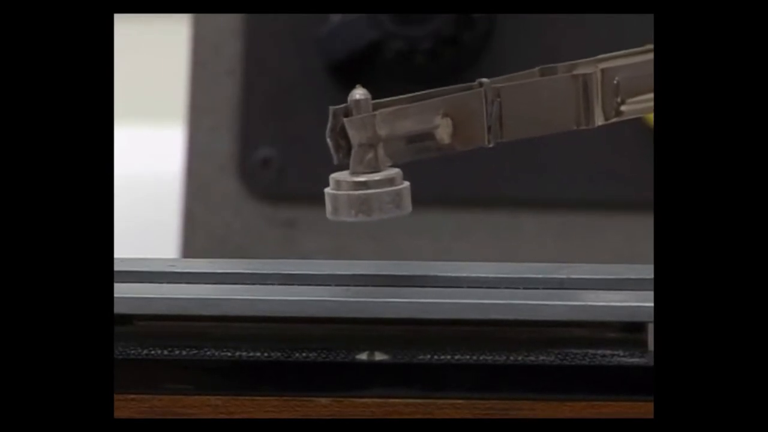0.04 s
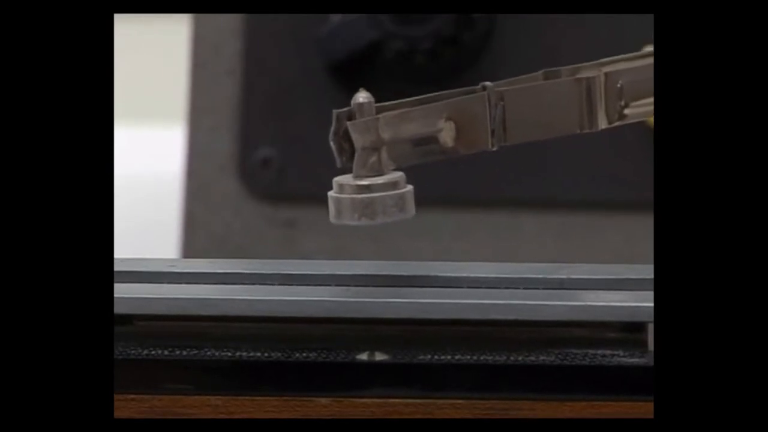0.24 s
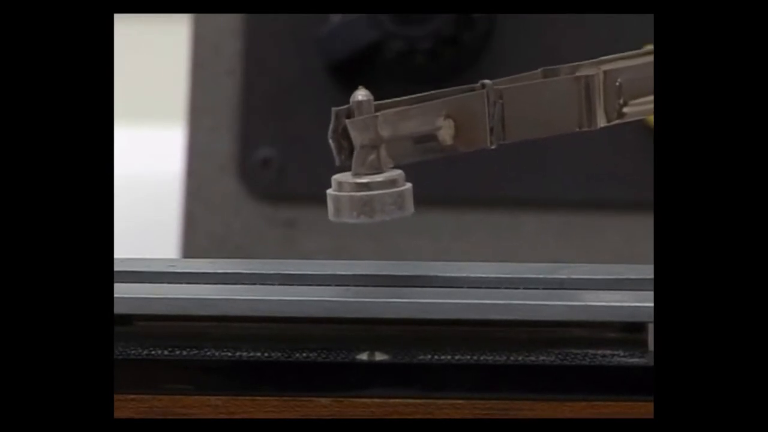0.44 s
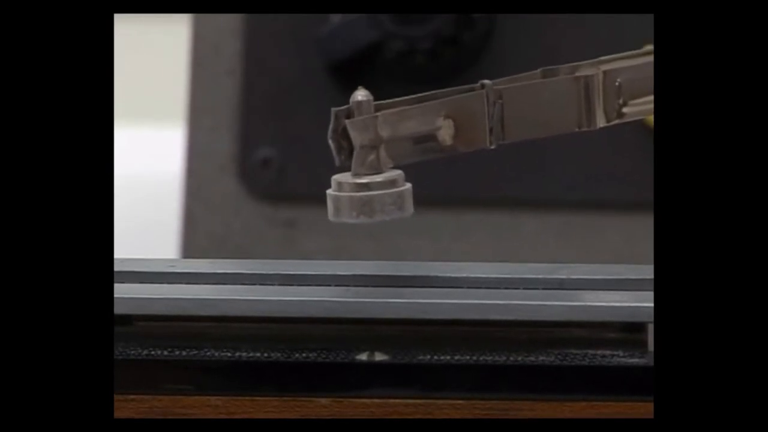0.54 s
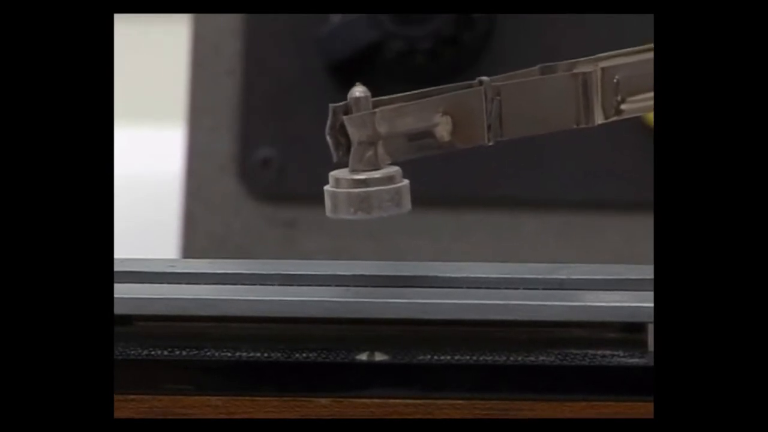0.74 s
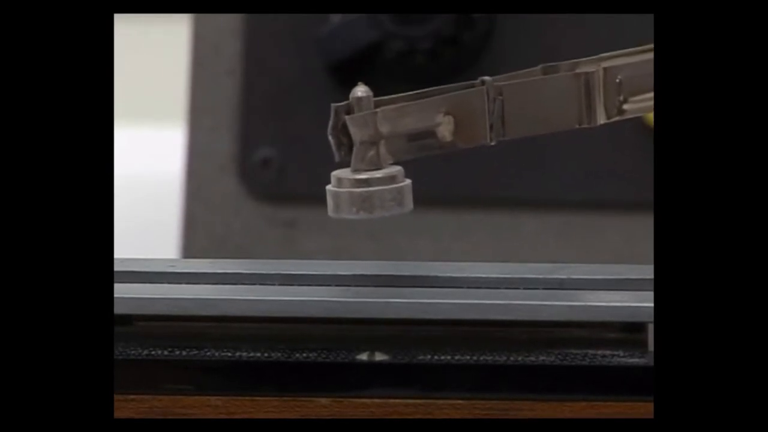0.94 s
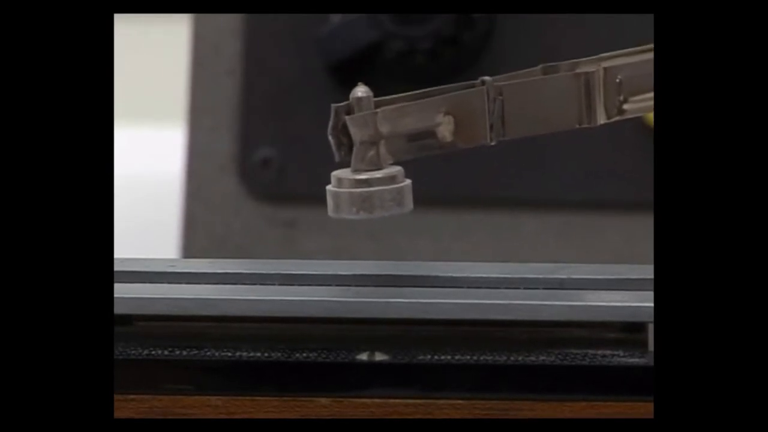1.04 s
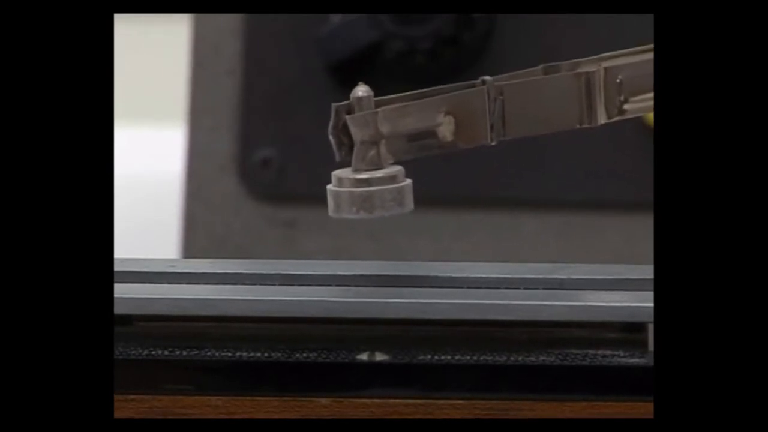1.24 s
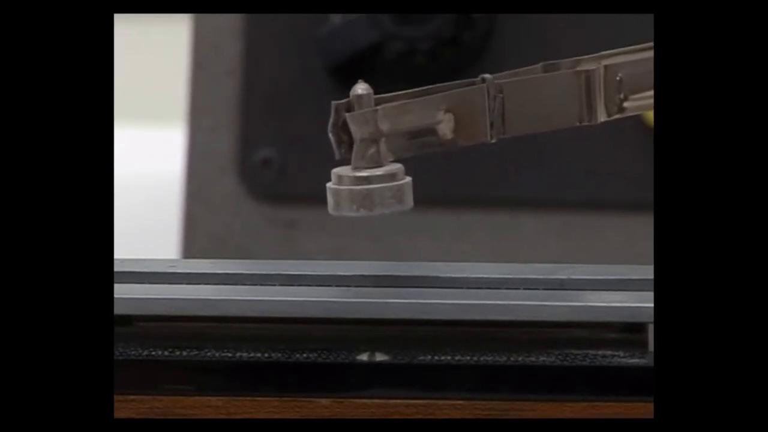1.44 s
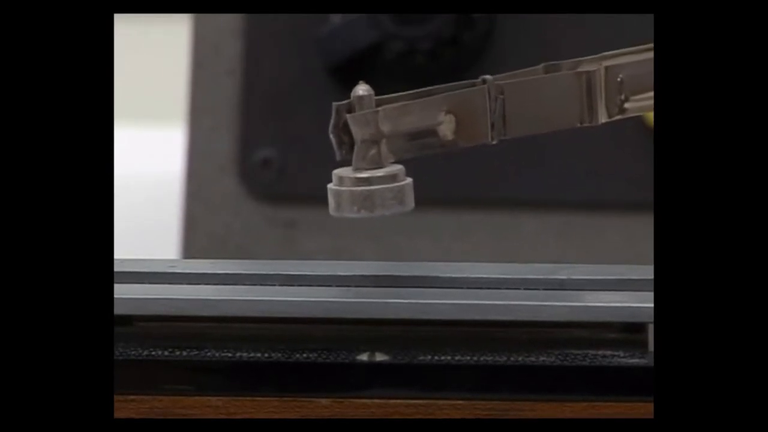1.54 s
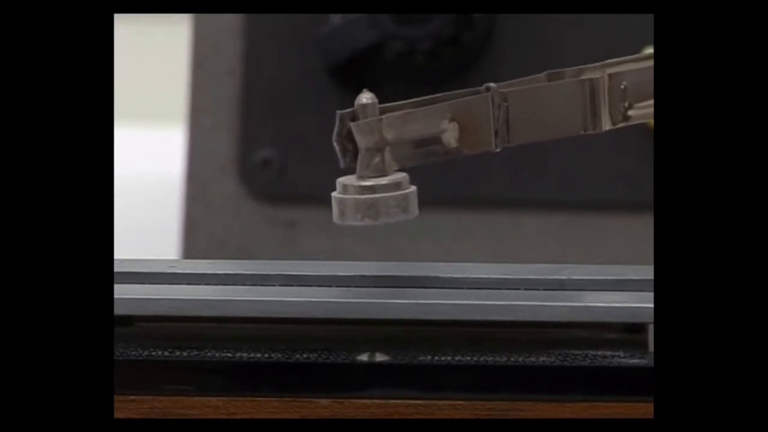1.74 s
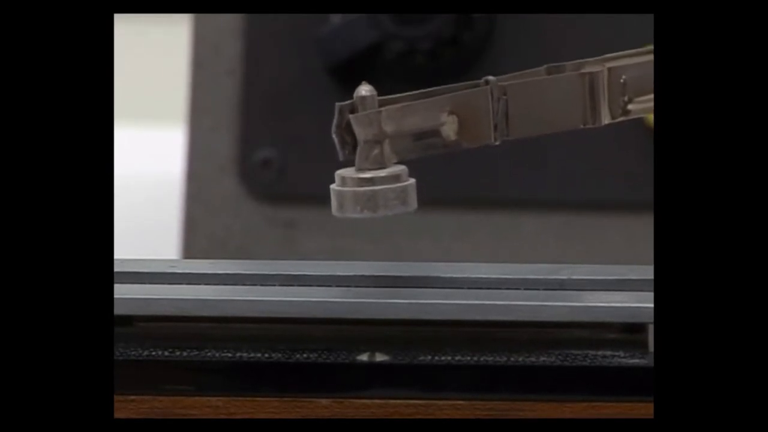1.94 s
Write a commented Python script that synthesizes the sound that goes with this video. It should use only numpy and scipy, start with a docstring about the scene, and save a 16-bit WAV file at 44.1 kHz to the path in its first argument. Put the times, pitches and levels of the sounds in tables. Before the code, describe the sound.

Electric spark snaps, two almost together then one alone, sharp and bright over faint room hiss

```python
"""Spark snaps in a laboratory

Three sparks jump from a thin wire to a metal gauze on a bench: pulses that ring the microphone's ports
and bounce off the apparatus, each with a bright noise tail from the hard-walled room.
Shaped noise makes the ventilation murmur and electronic hiss; a faint treble band flickers.
Low tones and soft noise rustles swell now and then, and gain control ducks all but the bass after each snap."""
import sys
import numpy as np
from scipy import signal
from scipy.fft import rfft, irfft, next_fast_len
from scipy.io import wavfile
from scipy.ndimage import uniform_filter1d, map_coordinates

SR = 44100
rng = np.random.default_rng(int(sys.argv[2]) if len(sys.argv) > 2 else 0)


def master(y):
    """Save y as 16-bit WAV."""
    cut = np.clip(np.atleast_2d(y).T, -1, 1)
    pcm = np.round(cut * 32767)  # scale
    wavfile.write(sys.argv[1], SR, pcm.astype(np.int16))


N = 88200


def amp(db):
    """dB to gain."""
    return 10 ** (np.asarray(db) / 20)


def unit(x):
    """Scale to an rms of 1."""
    return x / np.sqrt(np.mean(x ** 2) + 1e-20)


def along(points, hz):
    """Read a curve of (Hz, value) points along a log frequency axis."""
    point_hz, value = np.transpose(points)
    return np.interp(np.log(hz + 1), np.log(point_hz + 1), value)


def filtered(x, response):
    """Filter x by a complex response of frequency."""
    m = next_fast_len(N + SR // 2)
    spectrum = rfft(x, m) * response(np.fft.rfftfreq(m, 1 / SR))
    return irfft(spectrum, m)[..., :N]


def peak(f, hz, width_hz):
    """Response of one causal resonance; powers of it cascade equal resonators."""
    return 1j * f * width_hz / (hz * hz - f * f + 1j * f * width_hz)


def sides(db):
    """Left and right gains for a left-right difference in dB."""
    return amp(np.array([db / 2, -db / 2]))


# Spectrum of ventilation and hiss: pitch_hz [Hz], level_db [dB per Hz, relative]
AIR_SPECTRUM = [(12, -31), (20, -2.5), (27, -13.5), (98, -13.5), (123, -18.5), (270, -19), (347, -20.5),
                (485, -20), (976, -22), (1960, -37.5), (9140, -43.5), (11100, -41.5), (16000, -46.5)]
# How alike left and right are: pitch_hz [Hz], likeness [0 to 1]
AIR_LIKENESS = [(60, 0.89), (150, 0.87), (380, 0.69), (950, 0.75), (2380, 0.92), (5980, 0.83),
                (15000, 0.74)]
# How far the air leans left: pitch_hz [Hz], left_right_db [dB]
AIR_LEAN = [(60, 2.0), (150, 9), (380, 5.5), (950, 8), (2380, 2), (5980, -0.5), (15000, 3.5)]
AIR_DB, PATCHY_DB = -54, 1  # overall rms level, rms patchiness


def air():
    """Steady ventilation and hiss: shaped noise, slightly patchy in time and pitch, mostly stronger on the left."""
    z = signal.stft(rng.standard_normal((2, N + 512)), nperseg=512)[2]
    field = rng.standard_normal(z.shape[1:])
    field = uniform_filter1d(uniform_filter1d(field, size=12, axis=0), size=8, axis=1)
    pair = signal.istft(z * amp(PATCHY_DB * unit(field)), nperseg=512)[1][:, :N]

    def mid_side(hz):
        # the angle between shared and opposed noise sets the likeness
        turn = np.arccos(np.clip(along(AIR_LIKENESS, hz), -1, 1)) / 2
        return (hz > 10) * amp(along(AIR_SPECTRUM, hz)) * [np.cos(turn), np.sin(turn)]

    mid, side = filtered(pair, mid_side)
    stereo = np.array([mid + side, mid - side])
    return amp(AIR_DB) * unit(filtered(stereo, lambda hz: sides(along(AIR_LEAN, hz))))


FLICKER_HZ, FLICKER_WIDTH_HZ = 10600, 1700
FLICKER_DB, FLICKER_DEPTH_DB, FLICKER_LEFT_DB = -78, 5, 3  # depth is the limit either way


def flicker():
    """A faint resonant noise band of treble whose level wanders smoothly between random knots."""
    knots = rng.standard_normal(size=40)
    slow = map_coordinates(knots, [np.arange(N) * (len(knots) - 1) / N])
    band = unit(filtered(rng.standard_normal(N), lambda f: peak(f, FLICKER_HZ, FLICKER_WIDTH_HZ) ** 2))
    level = amp(FLICKER_DB + FLICKER_DEPTH_DB * np.tanh(2 * slow))
    return level * band * sides(FLICKER_LEFT_DB)[:, None]


# The sparks: start_s [s], snap_db [dB], left_right_db [dB], thump_db [dB re snap], knock_db [dB re snap],
# tail_db [dB], bright_hz [Hz], bright_db [dB re snap]; bright is the highest ring
SPARKS = [(.2461, 17.1, 4, -26.5, -22, -32, 13950, 0), (0.2858, 19.5, 3.5, -16, -34, -37.5, 14000, 0),
          (0.929, 15.14, 4, -15, -29, -35, 13600, 0)]
# Port resonances below the brightest ring: pitch_hz [Hz], width_hz [Hz, each resonator], level_db [dB]
PORTS = [(3120, 2000, -33.5), (4980, 800, -17.5), (6120, 780, -13), (7500, 1060, -10), (8600, 870, -13),
         (9700, 500, -31), (11850, 490, -9)]
# Echoes off gauze, frame and bench: delay_s [s], level_db [dB]
BOUNCES = [(.0005, -8), (.0011, -10), (.0016, -7), (.0022, -11), (.0028, -15), (.0045, -20), (.0075, -25)]
THUMP_HZ, THUMP_WIDTH_HZ = 833, 920
KNOCK_HZ, KNOCK_WIDTH_HZ = 1930, 230
BRIGHT_WIDTH_HZ, BRIGHT_LOSS_DB_PER_MS = 2000, 2
# random spread: of both sides together, of each side alone, of bounce level, of ring level
BOUNCE_SCATTER_S, PORT_SCATTER_S, BOUNCE_SCATTER_DB, RING_SCATTER_DB = .00004, .000012, 1.5, 2


def sparks():
    """A pressure pulse rings the ports; its bounces come back duller the later, timed apart left and right."""
    delay, loss_db = np.transpose([(0, 0)] + BOUNCES)

    def response(f):
        out = np.zeros((2, len(f)), complex)
        for start_s, snap_db, pan_db, thump_db, knock_db, _, bright_hz, bright_db in SPARKS:
            ring = 0
            for k, (hz, width_hz, level_db) in enumerate(PORTS):
                ring_gain = amp(level_db + RING_SCATTER_DB * rng.standard_normal())
                ring = ring + (-1) ** k * ring_gain * peak(f, hz, width_hz) ** 2
            luck = rng.standard_normal((4, len(delay))) * (delay > 0)  # the direct snap has no scatter
            bright_gain = amp(bright_db - BRIGHT_LOSS_DB_PER_MS * 1000 * delay[:, None])
            bright = peak(f, bright_hz, BRIGHT_WIDTH_HZ) ** 4 * bright_gain
            thump = amp(thump_db) * peak(f, THUMP_HZ, THUMP_WIDTH_HZ)
            knock = amp(knock_db) * peak(f, KNOCK_HZ, KNOCK_WIDTH_HZ) ** 2
            for side in range(2):
                when = start_s + delay + BOUNCE_SCATTER_S * luck[0] + PORT_SCATTER_S * luck[2 + side]
                size = amp(snap_db + loss_db + BOUNCE_SCATTER_DB * luck[1]) * sides(pan_db)[side]
                train = size[:, None] * np.exp(-2j * np.pi * f * when[:, None])
                # thump and knock sound with the direct snap only
                out[side] += ((ring + bright) * train).sum(0) + (thump - knock) * train[0]
        return out

    return filtered(np.ones(1), response)


# Tail decay: pitch_hz [Hz], t60_s [s to fall 60 dB]
ROOM_T60 = [(1000, 0.75), (2500, 0.68), (5300, 0.71), (9000, 0.77), (14000, 0.42)]
# Tail colour: pitch_hz [Hz], level_db [dB per Hz, relative]
ROOM_COLOUR = [(880, -26), (1500, -17), (1780, -14), (3030, -12.5), (5300, 0), (8410, -1.5), (12700, 2),
               (13900, 3.5), (14300, -38), (15000, -106)]
ROOM_DELAY_S, ROOM_RISE_S = 0.0046, 0.0037
ROOM_HOLD_S, ROOM_FALL_DB_PER_S = 0.23, 197  # after the hold, this extra fall
ROOM_ALIKE, ROOM_LEFT_DB = 0.56, 5.5  # left-right likeness, lean to the left


def room():
    """Each spark's noise tail swells in, dies at its own speed at each pitch, then falls away quickly."""
    out = np.zeros((2, N + 2 * SR))
    turn = np.arccos(np.clip(ROOM_ALIKE, 0, 1)) / 2
    rise = 1 - np.exp(-np.arange(SR) / SR / ROOM_RISE_S)
    for start_s, *_, tail_db, _, _ in SPARKS:
        hz, t, z = signal.stft(rng.standard_normal((2, SR)), SR, nperseg=256)
        colour_db = along(ROOM_COLOUR, hz)[:, None]
        decay_db = 60 * t / along(ROOM_T60, hz)[:, None]
        end_db = ROOM_FALL_DB_PER_S * np.clip(t - ROOM_HOLD_S, 0, None)
        a, b = signal.istft(z * amp(colour_db - decay_db - end_db), SR, nperseg=256)[1][:, :SR]
        mid, side = np.cos(turn) * a, np.sin(turn) * b
        tail = np.array([mid + side, mid - side])
        tail = tail / np.std(tail[:, :SR // 50])  # level set by the first 20 ms, before the rise
        start = round((start_s + ROOM_DELAY_S) * SR)
        out[:, start:start + SR] += amp(tail_db) * tail * rise
    return out[:, :N] * sides(ROOM_LEFT_DB)[:, None]


def swell(centre_s, length_s):
    """A soft bell-shaped rise and fall, at 14 % of its height half a length from the centre."""
    return np.exp(-8 * ((np.arange(N) / SR - centre_s) / length_s) ** 2)


# Low hum swells: centre_s [s], pitch_hz [Hz], length_s [s], level_db [dB, sine peak before the lean]
HUM_SWELLS = [(0.337, 152, 0.15, -54), (0.414, 100, 0.073, -53), (0.955, 152, 0.045, -50),
              (1.993, 160, 0.043, -51.5)]
# Soft rustles: centre_s [s], pitch_hz [Hz], width_hz [Hz, each resonator], length_s [s],
# level_db [dB, noise rms before the swell and lean]
RUSTLES = [(0.406, 308, 400, 0.078, -51), (0.443, 507, 90, 0.065, -52.5), (.44, 655, 91, 0.032, -56),
           (0.47, 446, 500, 0.12, -55.5), (0.583, 6900, 6000, 0.094, -62), (1.207, 1090, 1200, 0.075, -62),
           (1.225, 6800, 6000, 0.027, -59), (1.277, 6700, 6000, 0.082, -66), (1.987, 675, 200, 0.034, -64)]
HUM_LEFT_DB = 8


def hum():
    """Short soft swells of low sine tones and of resonant noise rustles, stronger on the left."""
    t = np.arange(N) / SR
    mono = np.zeros(N)
    for centre_s, hz, length_s, level_db in HUM_SWELLS:
        tone = np.sin(2 * np.pi * (hz * t + rng.random()))
        mono += amp(level_db) * swell(centre_s, length_s) * tone
    for centre_s, hz, width_hz, length_s, level_db in RUSTLES:
        rustle = unit(filtered(rng.standard_normal(N), lambda f: peak(f, hz, width_hz) ** 2))
        mono += amp(level_db) * swell(centre_s, length_s) * rustle
    return mono * sides(HUM_LEFT_DB)[:, None]


def scene():
    """Sparks, their tails and the background."""
    return sparks() + room() + air() + hum() + flicker()


DUCK_FROM_DB, DUCK_SHARE = -58, 0.22  # threshold, dB of ducking per dB above it
DUCK_RELEASE_S, DUCK_LAG_S, DUCK_ABOVE_HZ = 0.019, 0.009, 170
OFFSET, DRIFT_DB = .0056, -68.5  # constant offset at full scale 1, rms of its drift
TOP_HZ = 16000


def record(dry):
    """Gain control turns all but the bass down just after loud sounds; then a band limit and a drifting offset."""
    upper = filtered(dry, lambda hz: 1 / (1 + (DUCK_ABOVE_HZ / (hz + 1)) ** 4))
    keep = np.exp(-1 / (DUCK_RELEASE_S * SR))
    power = signal.lfilter([1 - keep], [1, -keep], np.mean(upper ** 2, 0))
    heard_db = 10 * np.log10(power + 1e-12)
    duck_db = -DUCK_SHARE * np.clip(heard_db - DUCK_FROM_DB, 0, None)
    gain = amp(np.pad(duck_db, (round(DUCK_LAG_S * SR), 0))[:N])
    ducked = dry - upper + upper * gain
    limited = filtered(ducked, lambda hz: np.clip((TOP_HZ - hz) / 400 + .5, 0, 1) ** 2)
    drift = amp(DRIFT_DB) * unit(filtered(rng.standard_normal(N), lambda hz: (hz > 1) * (hz < 12)))
    return limited + OFFSET + drift


dry = scene()
out = record(dry)
master(out)
```